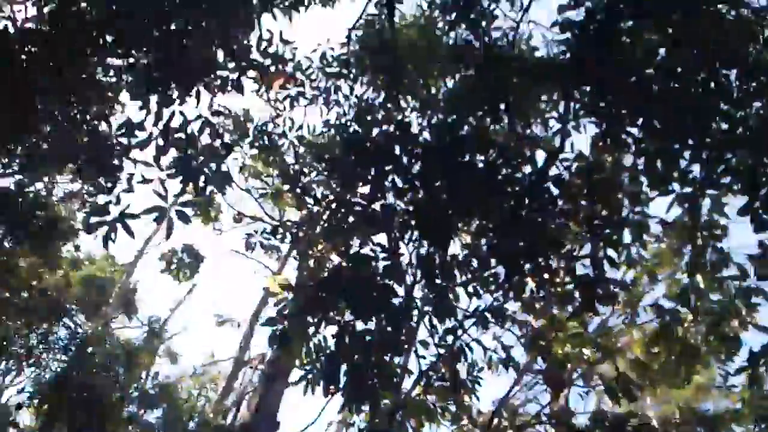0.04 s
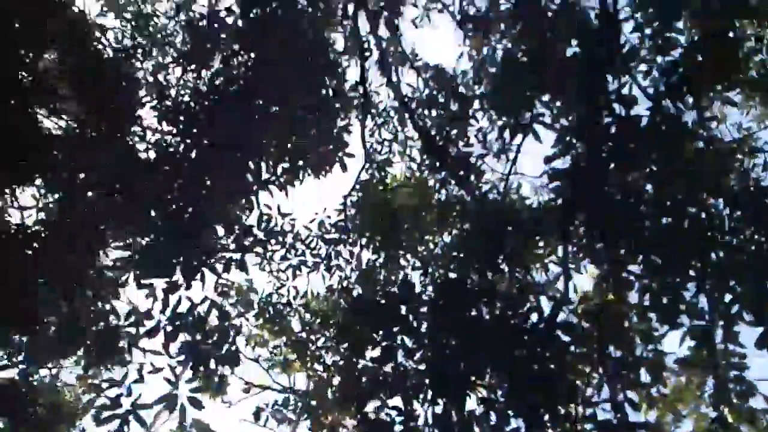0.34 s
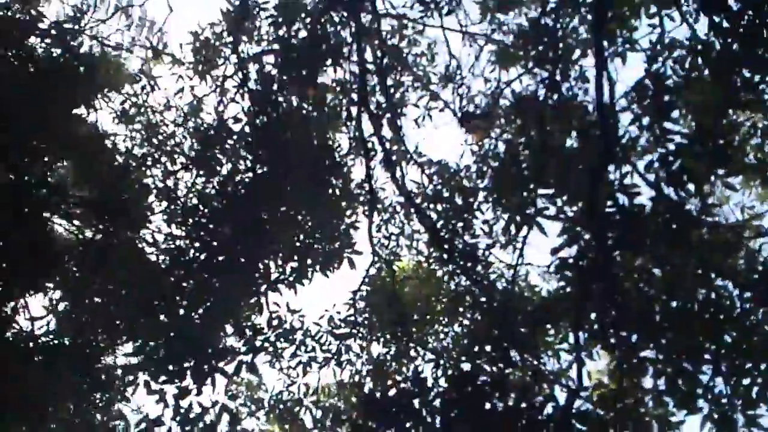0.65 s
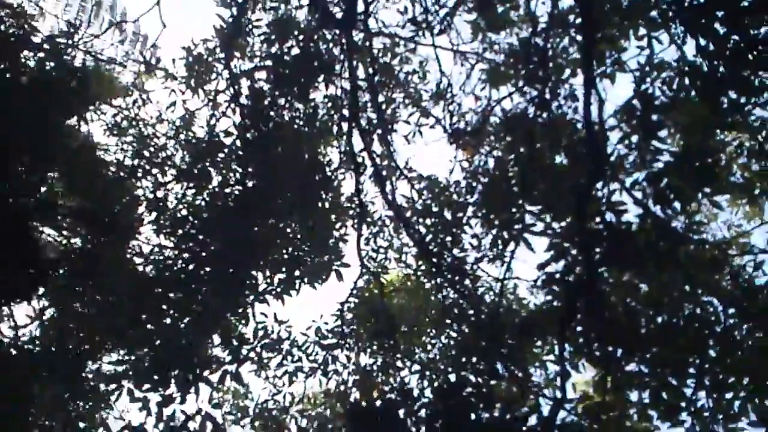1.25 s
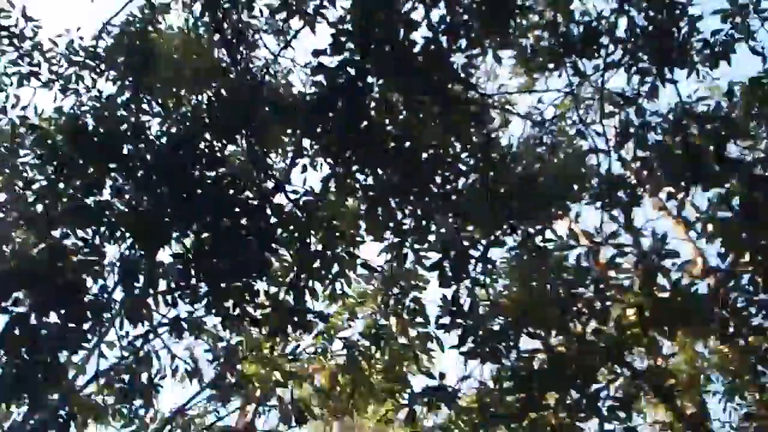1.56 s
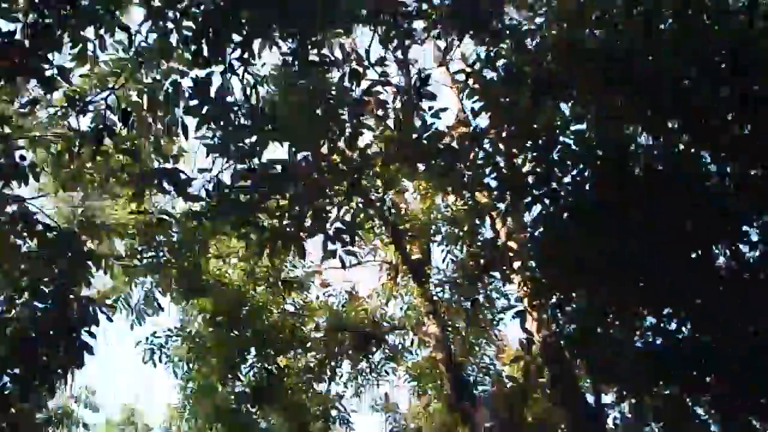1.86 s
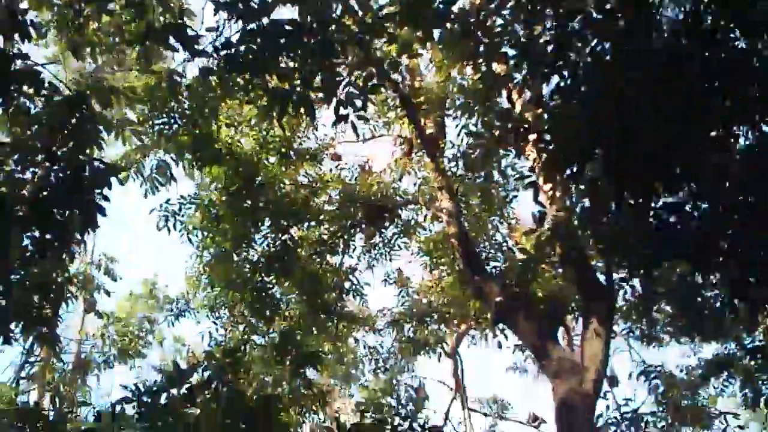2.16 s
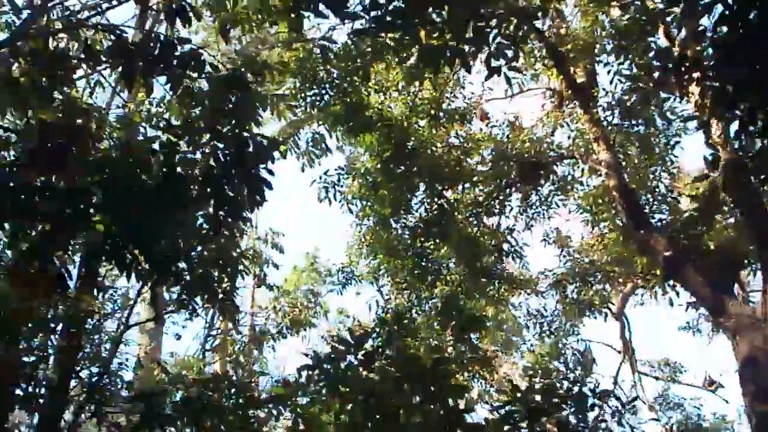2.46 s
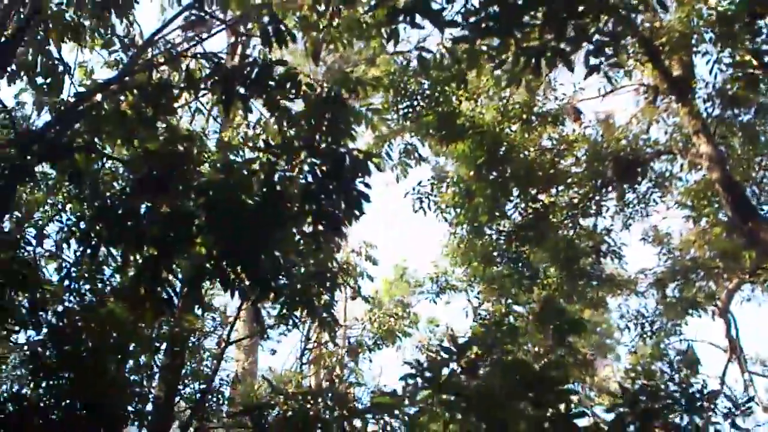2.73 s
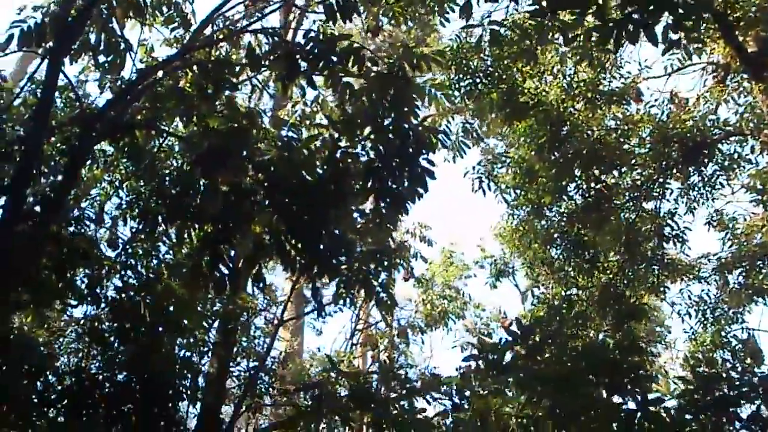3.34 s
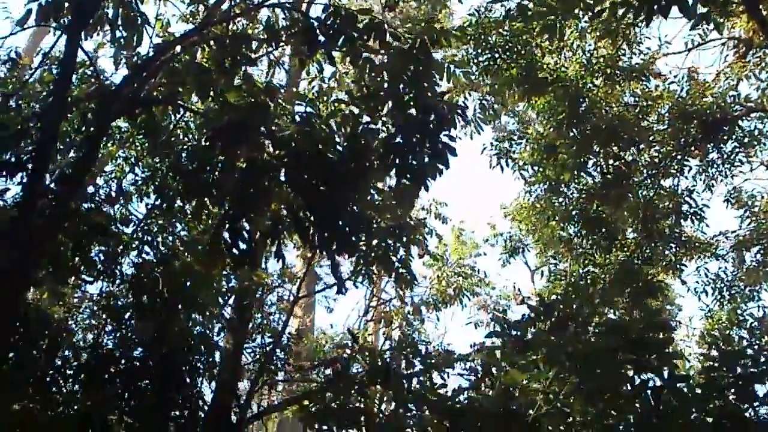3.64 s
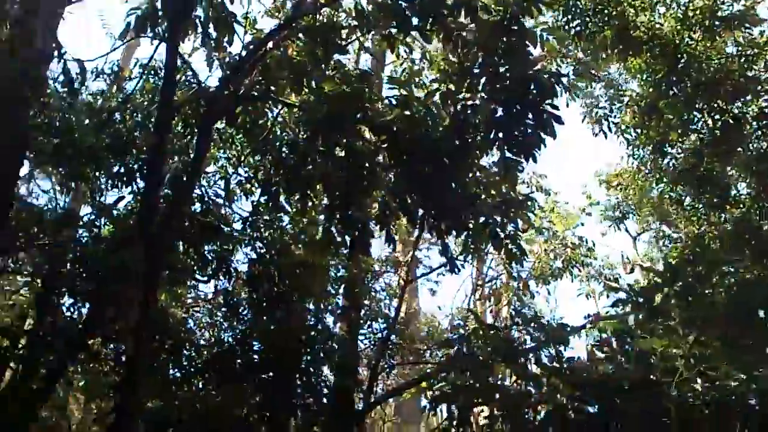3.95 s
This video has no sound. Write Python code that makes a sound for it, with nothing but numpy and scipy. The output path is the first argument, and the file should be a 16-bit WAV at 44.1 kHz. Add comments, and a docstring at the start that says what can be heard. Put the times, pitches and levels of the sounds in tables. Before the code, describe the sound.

Fruit bats squabble in the trees throughout, with overlapping raspy screeches, short yelps and thin squeals over distant chatter and faint forest hiss. Something snaps close by at about 1.2 seconds, and the calls are loudest from 1.6 to 2.8 seconds. Low wind rumble builds from 2 seconds, with a few dull microphone bumps after 3.2. Leaves crackle lightly at 2.3 seconds, then crackle and scuff around 3.8.

```python
"""Fruit bats squabbling in the treetops

Harsh, rattling screeches overlap as uneven pulses and puffs of hiss ring each bat's throat; clear yelps
and thin squeals cut through. Far bats chatter over forest hiss and a faint drone, and the trees scatter
every call. Near the microphone something snaps once, leaves crackle and scuff, and a low wind rumble
with a few dull bumps grows towards the end."""
import sys
import numpy as np
from scipy import signal
from scipy.fft import rfft, irfft
from scipy.io import wavfile

SR = 44100
rng = np.random.default_rng(int(sys.argv[2]) if len(sys.argv) > 2 else 0)


def to_wav(sig):
    """Store sig (one row per channel, or 1-D mono) as 16-bit WAV at the path in sys.argv[1].

    Samples outside -1..1 are clipped; the rate is SR.
    """
    pcm = np.clip(np.atleast_2d(sig), -1, 1) * 32767
    pcm = np.round(pcm).astype(np.int16)
    wavfile.write(sys.argv[1], SR, pcm.T)  # frames by channels


N = 176400


def amp(db):
    return 10 ** (np.asarray(db) / 20)


def unit(x):
    return x / np.sqrt(np.mean(x ** 2) + 1e-20)


def curve_at(points, hz):
    knots_hz, values = np.transpose(points)
    return np.interp(np.log(hz + 1), np.log(knots_hz + 1), values)


def add(mix, start_s, sound):
    part = mix[..., max(round(start_s * SR), 0):][..., :sound.shape[-1]]
    part += sound[..., :part.shape[-1]]


def bins_hz(x):
    return np.fft.rfftfreq(x.shape[-1], 1 / SR)


def colour(x, spectrum, share=1):
    """Filter by a dB spectrum scaled by share."""
    return irfft(rfft(x) * amp(share * curve_at(spectrum, bins_hz(x))), x.shape[-1])


def wander(size, rate_hz):
    """Random values joined by ramps."""
    return np.interp(np.arange(size) * rate_hz / SR, np.arange(400), rng.standard_normal(400))


def resonate(x, hz, width_hz):
    """Three-pole resonance tracking hz; width per pole, unit RMS out."""
    carrier = np.exp(2j * np.pi * np.cumsum(hz * np.ones(len(x))) / SR)
    pole = np.exp(-np.pi * width_hz / SR)
    return unit((carrier * signal.lfilter([1], np.poly([pole] * 3), x / carrier)).real)


# Echo decay: freq_hz, t60_s
TREE_DECAY = [(200, 0.17), (2500, 0.62), (6000, 0.57), (15000, 0.27)]

def trees(x, early_s=0.022, early_db=6):
    """Echoes scattered by trunks and leaves, strongest at first, different at each ear."""
    taps = rng.standard_normal((2, SR // 2)) * (rng.random((2, SR // 2)) < 3000 / SR)
    hz, t, spectra = signal.stft(taps, SR, nperseg=256)
    decay = amp(-60 * t / curve_at(TREE_DECAY, hz)[:, None] + early_db * np.exp(-t / early_s))
    tail = signal.istft(spectra * decay, SR, nperseg=256)[1]
    tail /= np.linalg.norm(tail, axis=1, keepdims=True)
    return signal.fftconvolve(x, tail, axes=1)[:, :N]


# Left-right tilt before each ear's share: freq_hz, tilt_db
STEREO_TILT = [(200, -1), (1200, -4), (2300, -5.5), (3400, 2), (5500, -0.5), (9000, 7), (15000, 28)]

def lean(x, left, right):
    """Some bands sit to the left, others to the right."""
    return np.array([colour(x[0], STEREO_TILT, left), colour(x[1], STEREO_TILT, right)])


# Forest hiss: freq_hz, gain_db
AIR_SPECTRUM = [(120, -51), (200, 0), (240, -1.5), (322, -5), (916, -8.5), (1350, -9), (2650, -5),
                (3620, -10), (6050, -14), (12600, -29), (16000, -45)]
# Left-right likeness: freq_hz, correlation
AIR_COHERENCE = [(200, 0.97), (400, 0.95), (700, 0.82), (1300, 0.36), (3000, 0.037), (15000, 0.044)]

def air(level_db=-50):
    """Steady forest hiss, centred in the bass, wide in the treble."""
    noise = rng.standard_normal((2, N))
    left, other = rfft(noise)
    same = curve_at(AIR_COHERENCE, bins_hz(noise))
    right = same * left + np.sqrt(1 - same ** 2) * other
    hiss = colour(irfft(np.array([left, right]), N), AIR_SPECTRUM)
    return amp(level_db) * unit(lean(hiss, left=0.15, right=-0.076))


def drone(level_db=-56.5):
    """Faint, steady low drone in the distance."""
    noises = rng.standard_normal((2, N))
    return amp(level_db) * np.array([resonate(noise, hz=123, width_hz=53) for noise in noises])


# Rumble: freq_hz, gain_db
WIND_SPECTRUM = [(12, -12.5), (20, 0.5), (38, 6), (81, -4), (179, -16), (282, -35.5), (325, -32.5),
                 (600, -44.5), (780, -88), (1320, -120)]
# Swell before boost and gusts: time_s, deep_db, upper_db
WIND_SWELL = [(0, -51, -61.5), (1.93, -52.5, -63), (2.03, -41, -56.5), (2.3, -46, -58), (2.7, -40, -52),
              (3.4, -37, -47.5), (4.0, -32.5, -39.5)]

def wind(split_hz=94.5, boost_db=3.5, gust_db=2, gusts_per_s=14):
    """Lumpy two-band rumble, unrelated at the two microphones."""
    time_s, deep_db, upper_db = np.transpose(WIND_SWELL)
    t, out = np.arange(N) / SR, []
    for noise in rng.standard_normal((2, N)):
        spectrum = rfft(colour(noise, WIND_SPECTRUM))
        lowpass = 1 / (1 + (bins_hz(noise) / split_hz) ** 6)
        deep = unit(irfft(spectrum * lowpass, N)) * amp(np.interp(t, time_s, deep_db))
        upper = unit(irfft(spectrum * (1 - lowpass), N)) * amp(np.interp(t, time_s, upper_db))
        out.append((deep + upper) * amp(boost_db + gust_db * wander(N, gusts_per_s)))
    return np.array(out)


# Dull bumps: centre_s, pitch_hz, envelope_db
MIC_BUMPS = [(3.264, 109, -34), (3.435, 46, -25.5), (3.59, 108, -27.5), (3.645, 50, -27), (3.704, 129, -23)]

def bumps(half_width_cycles=0.52):
    """Each bump is one low swing of pressure at both microphones."""
    out = np.zeros(N)
    for centre_s, pitch_hz, envelope_db in MIC_BUMPS:
        cycles = (np.arange(N) / SR - centre_s) * pitch_hz
        out += amp(envelope_db) * np.exp(-(cycles / half_width_cycles) ** 2) * np.sin(2 * np.pi * cycles)
    return out


def rustle(clumps, spectrum, stereo_width, echo_db, grains_per_s=6000, spread_db=3.5):
    """Short clumps of tiny clicks, with echoes."""
    out = np.zeros((2, N))
    t = np.arange(8192) / SR
    shape = (3, len(t))  # left, right, shared
    for start_s, length_s, level_db in clumps:
        grains = rng.standard_normal(shape) * (rng.random(shape) < grains_per_s / SR)
        grains *= amp(spread_db * rng.standard_normal(shape).clip(-2, 2))
        clicks = unit(colour(grains[2] + stereo_width * grains[:2], spectrum))
        envelope = np.sin(np.pi * np.minimum(t / length_s, 1)).clip(0) ** 0.5
        add(out, start_s, amp(level_db) * envelope * clicks)
    return out + amp(echo_db) * trees(out)


# Leaf events: start_s, length_s, level_db
LEAF_CRACKLES = [(1.178, .004, -76), (2.304, 0.011, -49), (2.343, 0.0076, -52), (2.421, 0.0047, -63),
                 (3.762, 0.01, -41.5), (3.80, 0.018, -46.5), (3.826, 0.036, -46.5)]
LEAF_SCUFFS = [(3.162, 0.036, -47), (3.772, 0.02, -43), (3.81, 0.057, -42), (3.86, 0.047, -36)]
# Leaf spectra: freq_hz, gain_db
CRACKLE_SPECTRUM = [(300, 1), (1200, 0), (4300, 3.5), (9000, -4), (16000, -10)]
SCUFF_SPECTRUM = [(100, -22), (300, -5), (560, 0.5), (800, -8), (1150, -3), (1500, -8), (1900, -10),
                  (4000, -23), (16000, -45)]

def leaves():
    """Crisp, wide crackles and dull, close scuffs."""
    crackles = rustle(LEAF_CRACKLES, CRACKLE_SPECTRUM, stereo_width=1, echo_db=7)
    scuffs = rustle(LEAF_SCUFFS, SCUFF_SPECTRUM, stereo_width=0.066, echo_db=-22)
    return crackles + scuffs


# Hollow knock: freq_hz, level_db, t60_s
KNOCK_MODES = [(570, -29, 0.011), (745, -23, 0.012), (1160, -60, 0.0073)]

def snap(start_s=1.2455, crack_db=-28, crack_decay_s=0.00057, lag_s=3e-5, echo_db=-3.5):
    """Sharp crack and short hollow knock, reaching the left ear first."""
    t, out = np.arange(2000) / SR, np.zeros((2, N))
    knock = sum(amp(db - 60 * t / t60_s) * np.sin(2 * np.pi * hz * t) for hz, db, t60_s in KNOCK_MODES)
    crack = amp(crack_db) * np.exp(-t / crack_decay_s) * rng.standard_normal(len(t))
    hit = signal.lfilter(*signal.butter(2, 350, "high", fs=SR), crack - knock)
    add(out[0], start_s, hit)
    add(out[1], start_s + lag_s, hit)
    return out + amp(echo_db) * trees(out, early_s=0.025, early_db=11)


def squeal(length_s, level_db, first_hz, last_hz, waver=0.024):
    """Thin, fluttering whistle that glides."""
    size = int(length_s * SR)
    hz = np.linspace(first_hz, last_hz, size) * (1 + waver * wander(size, 459))
    tone = np.sin(2 * np.pi * np.cumsum(hz) / SR + wander(size, 1100))
    flutter = 1 + wander(size, 604)
    envelope = np.sin(np.linspace(0, np.pi, size))
    return amp(level_db) * unit(envelope * tone * flutter)


def yelp(length_s, level_db, first_hz, last_hz, roughness, waver=0.02, flutter_hz=420, edge_s=0.003):
    """Short glide with two weak overtones; roughness flutters its strength and pitch."""
    t = np.arange(0, length_s, 1 / SR)
    hz = (first_hz + (last_hz - first_hz) * t / length_s) * (1 + waver * wander(len(t), 314))
    phase = 2 * np.pi * np.cumsum(hz) / SR + roughness * wander(len(t), flutter_hz)
    tone = np.sin(phase) + amp(-18.5) * np.sin(2 * phase) + amp(-19) * np.sin(3 * phase)
    flutter = 1 + roughness * wander(len(t), flutter_hz)
    envelope = np.minimum(np.minimum(t, length_s - t) / edge_s, 1)
    return amp(level_db) * envelope * unit(tone * flutter)


def rattle(size, pulses_per_s=175, jitter=0.3, spread_db=3.5, puff_s=0.0025):
    """Uneven voice pulses and the decaying puff of hiss after each."""
    cycles = np.cumsum(pulses_per_s * np.exp(jitter * wander(size, 150))) / SR
    strength = amp(spread_db * rng.standard_normal(200).clip(-1.2, 1.2))[cycles.astype(int) % 200]
    pulses = strength * np.diff(np.floor(cycles), prepend=0)
    gate = strength * np.exp(-(cycles % 1) / pulses_per_s / puff_s)
    return unit(pulses), unit(gate * rng.standard_normal(size))


def ring(x, hz, width_hz, sway=0.045, sway_hz=44.5):
    """Narrow, singing resonance that sways around hz."""
    return resonate(x, hz * (1 + sway * wander(len(x), sway_hz)), width_hz)


def timbre(x, spread_db=2.5, spacing_hz=256):
    """Random spectral peaks and dips give each call its own colour."""
    ripple = np.interp(bins_hz(x) / spacing_hz, np.arange(200), rng.standard_normal(200))
    return irfft(rfft(x) * amp(spread_db * ripple), len(x))


# Hiss in a screech: freq_hz, gain_db
HISS_SPECTRUM = [(200, -33), (700, 11), (1300, 0), (1900, 17), (3500, -21), (6000, 5), (8500, 1.5),
                 (11500, -4.5), (13500, -18), (16000, -61)]

def screech(length_s, level_db, throat_hz, treble_db, upper_hz, attack_s,
            rasp=0.57, open_s=0.0087, release_s=0.013, fade_db=-4.5):
    """Pulses and puffs ring the resonances of a throat that opens quickly; 0.2 s at most."""
    size = SR // 5
    t = np.arange(size) / SR
    mouth = (1 - 0.118 * np.exp(-t / open_s)) * (1 + 0.039 * wander(size, 78.6))
    pulses, puffs = rattle(size)
    drive = (1 - rasp) * pulses + rasp * puffs

    formant_hz = throat_hz * mouth
    throat = resonate(drive, formant_hz, width_hz=1250)
    throat += amp(-4) * ring(puffs, formant_hz, width_hz=370)
    chest_db = -10 + treble_db / 2 + 0.51 * (level_db + 46.5)  # louder calls are hoarser
    chest = amp(chest_db) * resonate(puffs, 0.64 * formant_hz, width_hz=1260)

    upper = amp(-3.5) * resonate(drive, upper_hz * mouth ** 0.5, width_hz=4200)
    top = amp(-5) * resonate(puffs, hz=7680, width_hz=7850)
    shrill = amp(-5) * ring(puffs, upper_hz, width_hz=650)
    squeak = amp(-19) * ring(puffs, hz=8680, width_hz=410, sway=0.073)
    hiss = amp(-8 + treble_db / 2) * unit(colour(puffs, HISS_SPECTRUM))
    treble = timbre(amp(treble_db) * (upper + top + shrill + squeak) + hiss)

    envelope = np.minimum(t / attack_s, 1) * np.clip((length_s - t) / release_s + 0.5, 0, 1)
    envelope *= amp(fade_db * (np.minimum(t / length_s, 1) - 0.5))
    return amp(level_db) * envelope * (unit(throat) + chest + treble)


def far_chatter(perch_count, calls_per_s=20):
    """Faint random screeches of far bats, one track per perch."""
    perches = np.zeros((perch_count, 1, N))
    for k, (offset, stretch, distance, detune) in enumerate(rng.uniform(-1.1, 1, (90, 4))):
        tune = 1 + 0.12 * detune
        call = screech(length_s=0.046 * 2 ** stretch, level_db=-67 - 2 * distance,
                       throat_hz=2410 * tune, treble_db=4.5, upper_hz=6490 * tune, attack_s=0.014)
        add(perches[k % perch_count], (k + offset) / calls_per_s, call)
    return perches


# Top treble of the calls: time_s, gain_db
SHEEN_GAIN = [(0, 2), (.7, 6.5), (1.8, 2), (2.1, -5), (2.55, -1), (3.1, -6.5), (4, -2)]

def sheen(x, corner_hz=8400):
    """The top treble grows and fades."""
    highpass = 1 - 1 / (1 + (bins_hz(x) / corner_hz) ** 8)
    top = irfft(rfft(x) * highpass, N)
    gain = amp(np.interp(np.arange(N) / SR, *np.transpose(SHEEN_GAIN)))
    return x + top * (gain - 1)


# Rasping calls: start_s, length_s, level_db, throat_hz, treble_db, upper_hz, attack_s
BAT_SCREECHES = [(0, 0.12, -52, 2500, 1, 6420, 0.0033), (0.102, 0.12, -50.5, 2310, -2.5, 6460, 0.0084),
                 (0.216, 0.27, -53, 2350, -4, 6100, 0.02), (0.358, 0.02, -49, 2080, -13, 5900, 0.0091),
                 (0.421, 0.13, -43, 2480, -8, 5800, 0.03), (0.532, 0.17, -50.5, 2640, -7, 5540, 0.027),
                 (0.668, 0.11, -47, 2660, -6.5, 5860, 0.012), (0.73, 0.057, -46.5, 2500, -13, 5400, 0.0071),
                 (0.837, 0.039, -51.5, 2230, -2, 6040, 0.0069), (0.898, 0.09, -57.5, 2290, -2, 5970, 0.042),
                 (1.065, 0.029, -57, 2280, -16, 5670, 0.012), (1.18, 0.019, -59, 2300, -8, 5700, .008),
                 (1.361, 0.029, -42, 2440, -12, 5830, 0.01), (1.41, 0.083, -45.5, 2480, -7.5, 6150, 0.015),
                 (1.596, 0.092, -46.5, 2530, -4.5, 6170, 0.0047),
                 (1.638, 0.059, -45, 2420, -1.5, 5620, 0.015),
                 (1.698, 0.041, -44.5, 2400, -2, 5430, 0.0037), (1.745, 0.1, -47, 2490, -4.5, 6000, 0.019),
                 (1.801, 0.016, -47, 2510, 3, 4830, 0.004), (1.962, 0.056, -41.5, 2670, -1, 6200, 0.007),
                 (2.043, 0.02, -45, 2870, -4.5, 5650, 0.005), (2.094, 0.052, -39, 2220, -5.5, 5880, 0.011),
                 (2.15, 0.067, -44, 2350, -1.5, 5840, 0.03), (2.227, 0.076, -41, 2280, -3.5, 6100, 0.01),
                 (2.289, 0.027, -49, 2280, 7.5, 5900, 0.016), (2.332, 0.021, -36, 2030, -12, 5700, 0.0099),
                 (2.382, 0.047, -41, 2300, -3, 5950, 0.015), (2.428, 0.097, -40.5, 2750, -3.5, 6120, 0.007),
                 (2.52, 0.087, -43.5, 2700, -2, 5830, 0.021), (2.63, 0.048, -43, 2490, -2.5, 6260, 0.019),
                 (2.702, 0.11, -43, 2580, -1.5, 6150, 0.0026),
                 (2.799, 0.11, -43.5, 2635, -3.5, 5600, 0.0089),
                 (2.937, 0.027, -43.5, 2060, -39, 5890, 0.01), (3.024, 0.072, -46.5, 2370, 0, 6100, 0.0073),
                 (3.102, 0.059, -46, 2270, -0.5, 6060, 0.019), (3.161, 0.049, -46.5, 2310, 0, 5500, 0.016),
                 (3.256, 0.016, -37.5, 2100, -28, 5530, 0.0085),
                 (3.298, 0.048, -44.5, 2480, -1.5, 5770, 0.0063),
                 (3.432, 0.046, -43, 2620, -2.5, 5900, 0.014), (3.489, 0.046, -44, 2520, -5, 6200, 0.0053),
                 (3.565, 0.023, -42, 2270, -8, 6100, 0.0082), (3.616, 0.038, -43, 2560, -3.5, 6430, 0.0093),
                 (3.684, 0.029, -46, 2190, -5, 5800, 0.0078), (3.743, 0.12, -45, 2370, -4.5, 6230, 0.037),
                 (3.891, 0.1, -47, 2530, -1.5, 6200, 0.018)]
# Clear calls: start_s, length_s, level_db, first_hz, last_hz, roughness
BAT_YELPS = [(.052, 0.039, -47.5, 3270, 2430, .2), (.274, 0.029, -42, 2370, 2270, 0),
             (.425, 0.05, -43.5, 2295, 2390, .3), (.468, 0.031, -43, 2500, 2590, 0.5),
             (.515, 0.042, -43, 2634, 2390, .6), (.575, 0.038, -39, 2577, 2600, 0.65),
             (.632, .036, -42, 2627, 2730, 0.3), (.742, 0.048, -42, 2680, 2473, 0.46),
             (.845, 0.022, -42.5, 1935, 2170, 0.4), (1.668, 0.057, -35, 2742, 2460, 0.5),
             (1.703, 0.033, -32.5, 2250, 2376, 0), (1.73, 0.076, -40.5, 2430, 2573, .85),
             (1.801, 0.021, -29, 2453, 2594, 0), (2.048, 0.02, -44.5, 2910, 2780, 0.1),
             (2.093, 0.01, -28.5, 2290, 2300, 0.15), (2.107, 0.0095, -33, 2166, 2150, 0.34),
             (2.229, 0.03, -37, 2140, 2110, 0.5), (2.255, .03, -40.5, 2280, 2210, .9),
             (2.338, 0.014, -40.5, 2043, 1820, 0.2), (2.704, 0.027, -32.5, 2300, 2495, 0),
             (2.75, 0.022, -38, 2480, 2574, 0.3), (3.022, 0.023, -40, 2053, 2470, 0.3),
             (3.115, 0.0075, -36, 2200, 2340, 0.5), (3.3, 0.023, -34.5, 2090, 2436, 0.4),
             (3.43, 0.014, -41, 2280, 2520, 0.4), (3.612, 0.018, -42, 2360, 2630, 0.2),
             (3.741, 0.019, -48, 2030, 2220, 0.4)]
# Thin, high calls: start_s, length_s, level_db, first_hz, last_hz
BAT_SQUEALS = [(.03, 0.045, -43, 7000, 6430), (.23, 0.083, -47.5, 5880, 5850), (.335, .03, -56, 6450, 6300),
               (.49, 0.03, -46.5, 5760, 6260), (.578, 0.017, -44, 5580, 5500),
               (1.645, 0.043, -45, 5970, 6500), (1.797, 0.025, -54, 4670, 4930),
               (1.943, 0.0256, -45, 7700, 6350), (1.985, 0.03, -37, 7090, 7160),
               (2.103, 0.056, -42, 5900, 5980), (2.62, 0.12, -49.5, 9340, 9000),
               (3.115, .035, -42, 5920, 5960)]

def colony(perch_count=5, lag_step_s=3e-5, direct_db=-3.5):
    """Bats call from perches, each with its own ear delay and echoes; far ones are echo only."""
    direct, perches = np.zeros((2, N)), np.zeros((perch_count, 1, N))
    voices = (BAT_SCREECHES, screech, -1), (BAT_YELPS, yelp, -9), (BAT_SQUEALS, squeal, -9)
    for table, voice, echo_db in voices:
        for k, (start_s, *settings) in enumerate(table):
            call = voice(*settings)
            perch = k % perch_count
            add(direct[0], start_s, call)
            add(direct[1], start_s + lag_step_s * (perch - perch_count // 2), call)
            add(perches[perch], start_s, amp(echo_db) * call)
    perches += far_chatter(perch_count)
    echoes = sum(trees(track) for track in perches)
    return lean(amp(direct_db) * direct + echoes, left=0.22, right=-0.66)


def scene():
    return sheen(colony()) + air() + drone() + wind() + bumps() + snap() + leaves()


def record(dry, cutoff_hz=15800):
    """Steep low-pass band limit."""
    lowpass = signal.firwin(511, cutoff_hz, window=("kaiser", 9), fs=SR)
    return signal.oaconvolve(dry, lowpass[None], "same")


dry = scene()
out = record(dry)
to_wav(out)
```